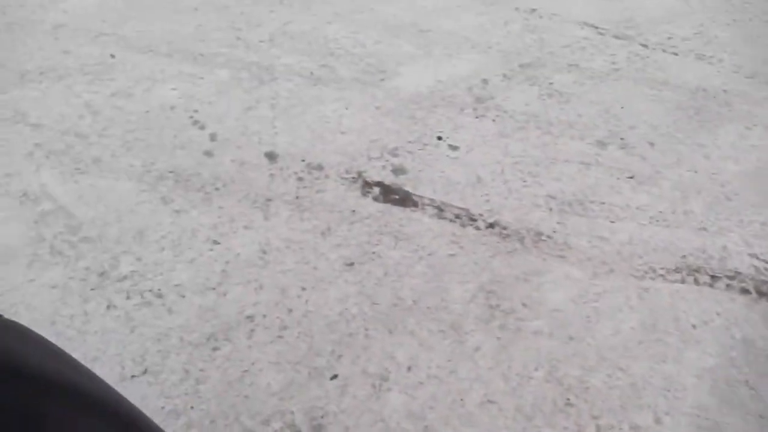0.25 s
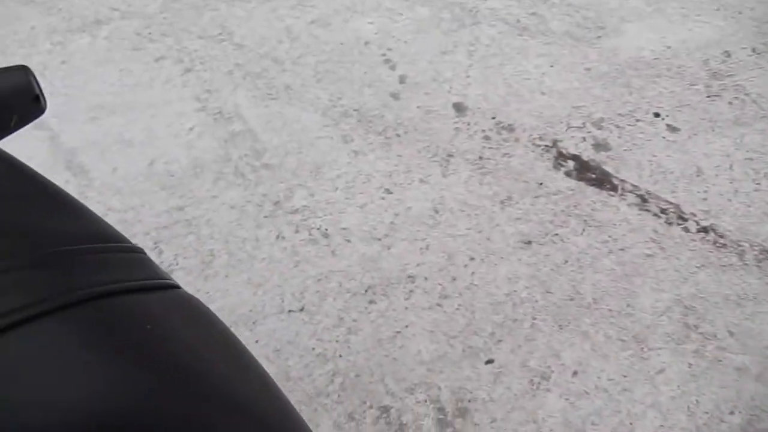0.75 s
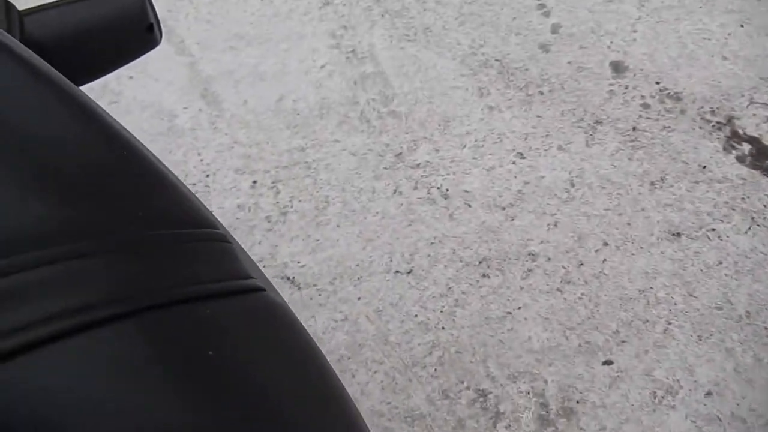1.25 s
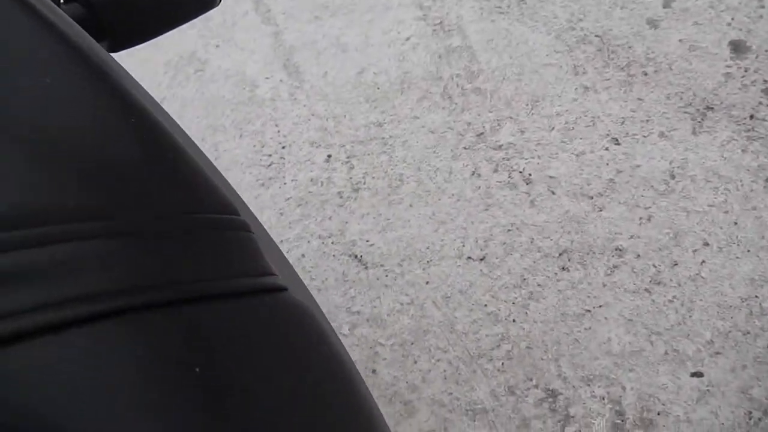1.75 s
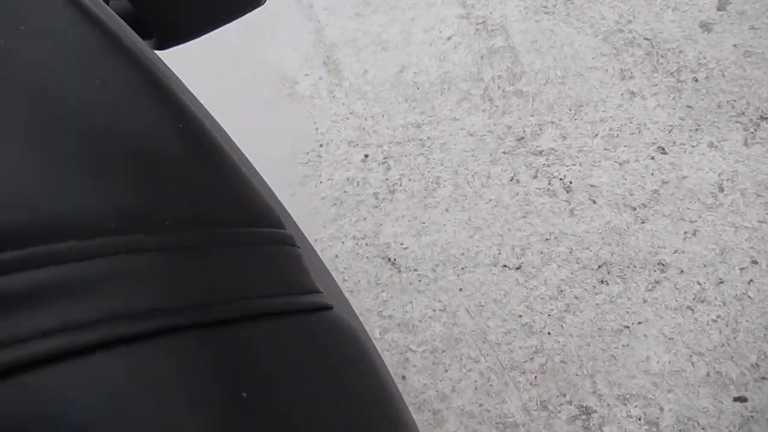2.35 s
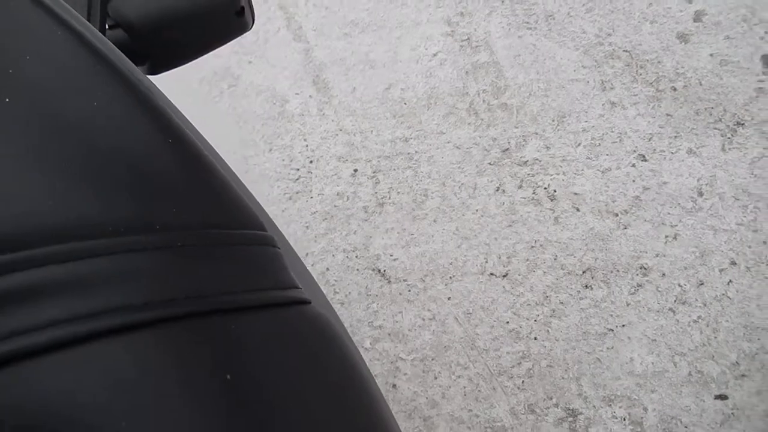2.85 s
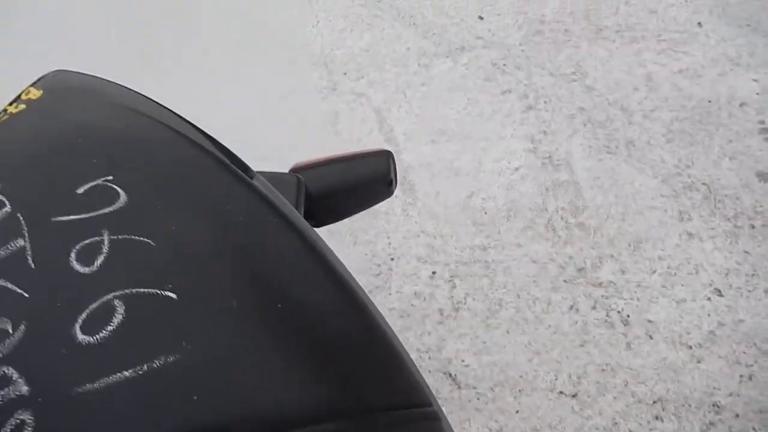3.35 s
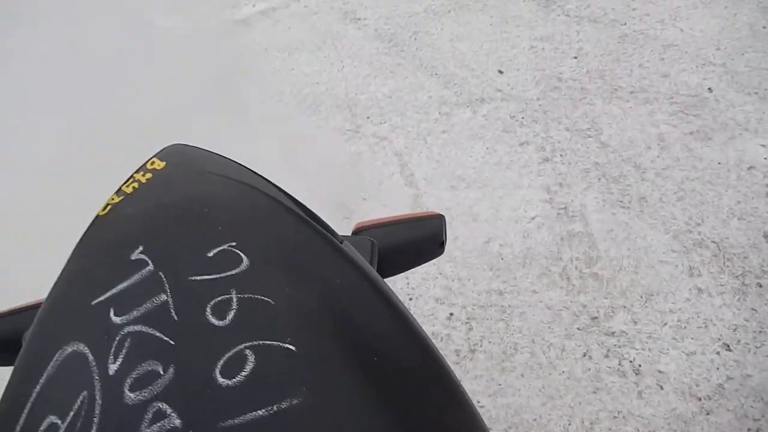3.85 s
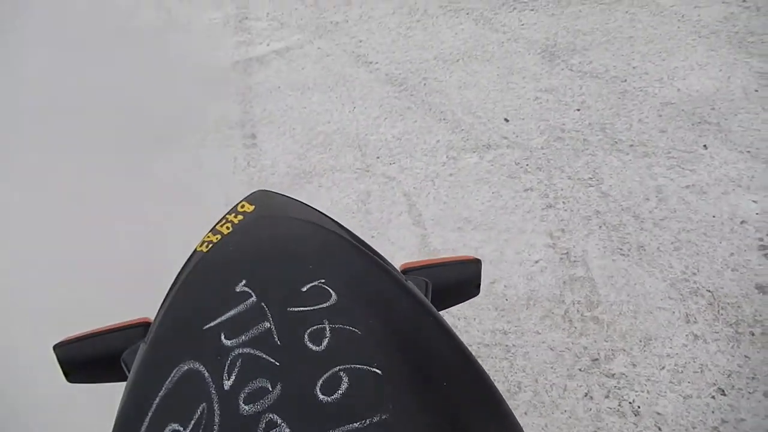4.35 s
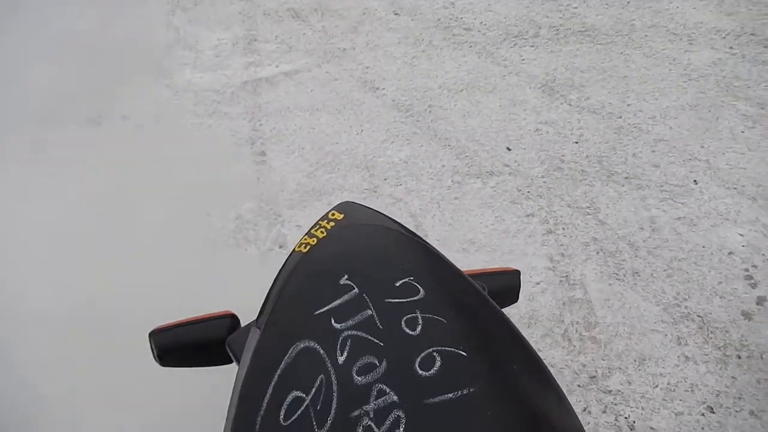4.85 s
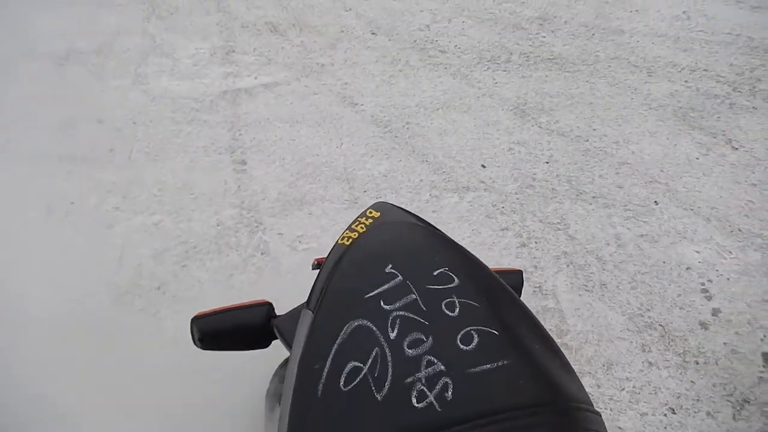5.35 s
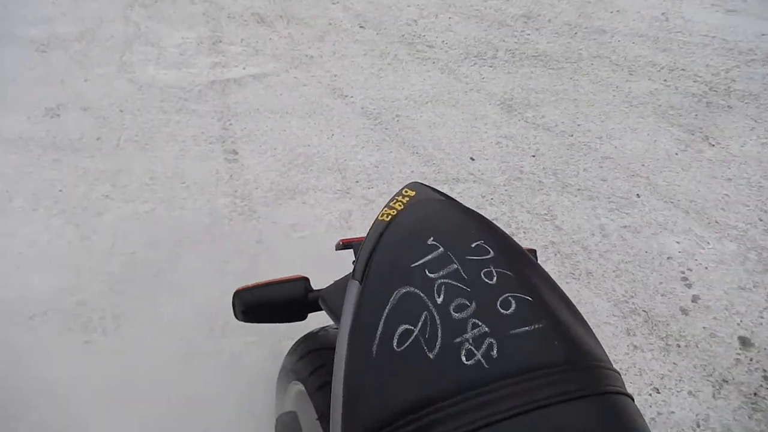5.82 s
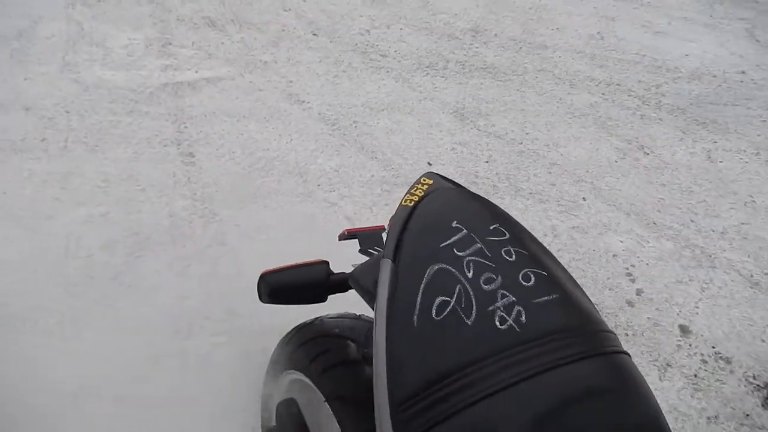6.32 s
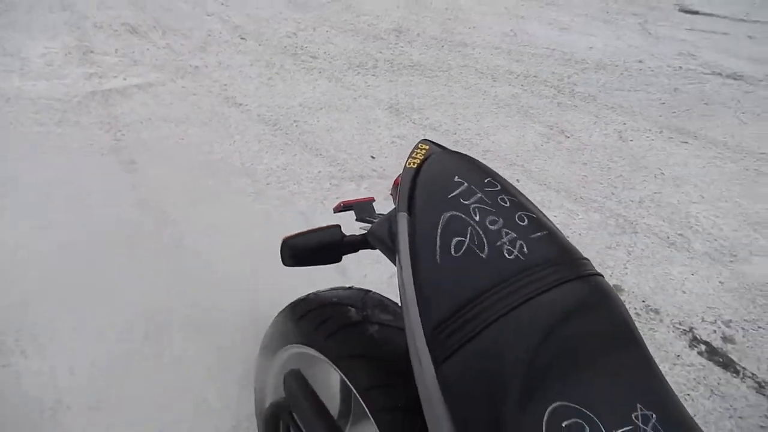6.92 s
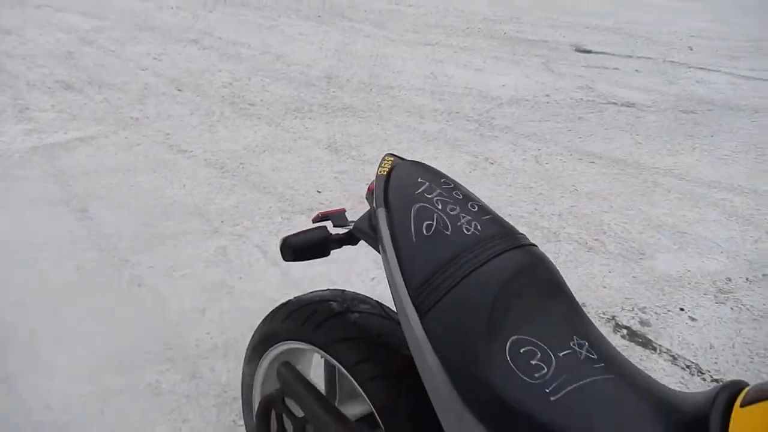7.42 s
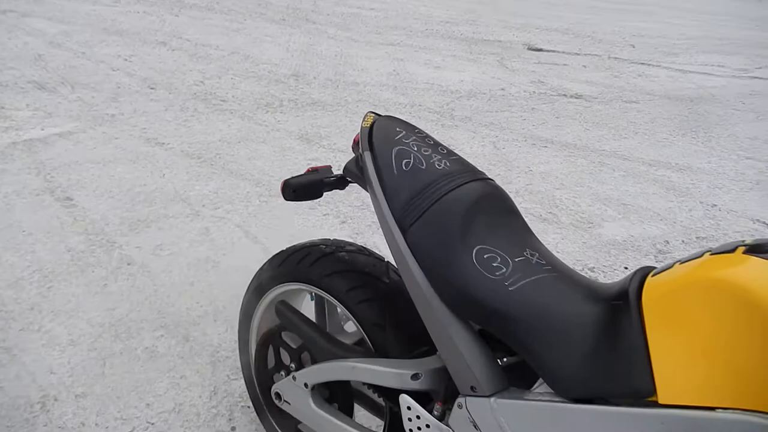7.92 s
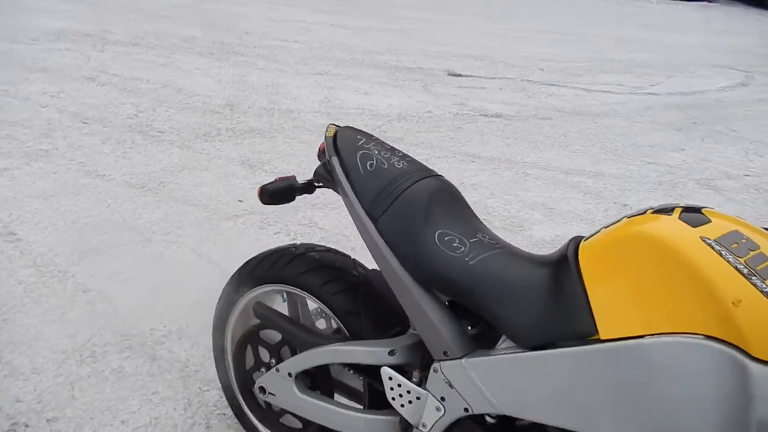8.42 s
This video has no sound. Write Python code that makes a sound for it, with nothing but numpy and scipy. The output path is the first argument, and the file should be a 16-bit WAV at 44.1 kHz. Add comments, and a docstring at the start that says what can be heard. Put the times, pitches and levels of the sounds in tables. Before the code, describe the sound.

A twin-cylinder motorcycle idles with a lumpy, skipping beat of deep exhaust thumps, metallic ticks and chain hiss. After two seconds a hollow whump starts four throttle blips, each faster than the last, with growl, rasp and intake snarl. It runs down through heavy burbles and ringing silencer, pops, then settles into irregular idle. Open concrete lot, close stereo microphone, bike slightly to the right, faint short reflections.

```python
"""A V-twin motorcycle on an open concrete lot idles with a lumpy beat of paired and skipped firings.
A hollow whump opens the first of four throttle blips, each reaching a higher speed than the last.
It then coasts with heavy single burns and surges of can ringing, pops, and settles to idle with soft huffs.
Exhaust puffs excite resonances of the pipe and the silencer can, and revving adds harmonic engine orders.
Shaped noise makes the gas jet, intake, chain hiss, ticks and clatter."""
import sys
import numpy as np
from scipy import signal
from scipy.fft import rfft, irfft
from scipy.io import wavfile
from scipy.ndimage import uniform_filter1d

SR = 44100
rng = np.random.default_rng(int(sys.argv[2]) if len(sys.argv) > 2 else 0)


def store_wav(level_fs):
    """Save 16-bit WAV to argv[1]."""
    pcm = np.round(np.clip(np.atleast_2d(level_fs), -1, 1) * 32767)
    wavfile.write(sys.argv[1], SR, pcm.T.astype(np.int16))


N = 382784
TIME = np.arange(N) / SR
REV_START_S, REV_END_S = 2.23, 6.55
REAR_DELAY = 315 / 720  # the rear cylinder fires this share of a four-stroke cycle after the front
IDLE_CYCLE_S = .125


def from_db(db):
    """Logarithmic level: decibels to amplitude ratio."""
    return 10 ** (np.asarray(db) / 20)


def rms_one(x):
    """Normalisation to unit mean power."""
    return x / np.sqrt(np.mean(x ** 2) + 1e-20)


def in_time(rows):
    """Linear interpolation of each column of a curve at every sample."""
    s, *columns = np.transpose(rows)
    return [np.interp(TIME, s, column) for column in columns]


def per_bin(points):
    """Interpolation of a spectrum over log frequency, at every FFT bin."""
    hz, value = np.transpose(points)
    bin_hz = np.arange(N // 2 + 1) * SR / N
    return np.interp(np.log(bin_hz + 1), np.log(hz), value)


def cut(x, hz, kind, order=2):
    """Butterworth filtering: a maximally flat passband."""
    return signal.sosfilt(signal.butter(order, hz, kind, fs=SR, output="sos"), x + 1e-18)


def resonate(x, modes):
    """Modal superposition: parallel damped resonators, rows of (f/Hz, width/Hz, level/dB)."""
    out = 0
    for hz, width, db in modes:
        radius = np.exp(-np.pi * width / SR)
        poles = [1, -2 * radius * np.cos(2 * np.pi * hz / SR), radius * radius]
        out = out + from_db(db) * (1 - radius) * signal.lfilter([1, 0, -1], poles, x + 1e-18)
    return out


def evened(x):
    """Short-term power normalisation over about a tenth of a second, with a floor for quiet parts."""
    power = uniform_filter1d(uniform_filter1d(x ** 2, size=3500), size=2500)
    return x / np.sqrt(np.abs(power) + power.max() / 10 ** 4)


def clicks(times, sizes):
    """Impulse excitation: one weighted sample for each event."""
    return np.bincount(np.clip(np.asarray(times) * SR, 0, N - 1).astype(int), sizes, N)


def swell(impulses, rise_s, decay_s):
    """Convolution: every impulse becomes an exponential burst envelope with a peak of its own height."""
    t = TIME[:SR // 4]
    shape = (1 - np.exp(-t / rise_s)) * np.exp(-t / decay_s)
    return signal.fftconvolve(impulses, shape / shape.max())[:N]


def bumps(rows):
    """Superposition of Gaussian bumps, rows of (t/s, half length/s, height)."""
    return sum(height * np.exp(-((TIME - s) / half_s) ** 2) for s, half_s, height in rows)


def delayed(x, lag):
    """Propagation delay in whole samples."""
    return np.pad(x, (int(abs(lag)), 0))[:N]


# likeness of the noise at the two microphone ports: f/Hz, likeness/1
LIKENESS = [(100, .99), (500, .93), (1000, .85), (2000, .8), (6000, .65), (13000, .5)]


def noise(colour):
    """Partial coherence: coloured stereo noise, less alike at the two ports in the treble; rms 1."""
    mid, side = rfft(rng.standard_normal((2, N)))
    alike = np.clip(per_bin(LIKENESS), 0, 1)
    ports = np.sqrt(1 + alike) * mid + np.sqrt(1 - alike) * side * [[1], [-1]]
    # the colour dies away an octave beyond either end
    ends = [(colour[0][0] / 2, -90), *colour, (colour[-1][0] * 2, -90)]
    return rms_one(irfft(ports * from_db(per_bin(ends)), N))


def knocks(rows, colour, rise_s, decay_s):
    """Dense modal ringing as noise bursts; the squared envelope starts softly and decays twice as fast."""
    times, db = np.transpose(rows)
    return swell(clicks(times, from_db(db / 2)), rise_s, decay_s) ** 2 * noise(colour)


# reflections around the lot: delay t/s, left level/dB, right level/dB
ECHOES = [(.011, -39, -41), (.017, -36, -29), (0.028, -10.5, -11)]


def reflections(exhaust):
    """Specular reflection: dull, delayed copies of the left port's exhaust sound."""
    dull = cut(exhaust[0], 1550, "low")
    return sum(from_db([[left_db], [right_db]]) * delayed(dull, s * SR) for s, left_db, right_db in ECHOES)


# throttle blips: opening t/s, shutting t/s, push/(four-stroke cycles/s^2)
BLIPS = [(2.1, 2.599, 46.7), (3.021, 3.232, 99.3), (3.594, 3.801, 88.1), (4.173, 4.464, 65.8)]
START_CYCLES_PER_S = 20.69
DRAG_PER_S = .62  # share of the speed lost per s
OPEN_S, SHUT_S = .104, .159  # time the push takes to build and to die


def effort():
    """Driven rotation with drag: speed in cycles/s, its share of top speed, and throttle opening."""
    push = 0
    for opens, shuts, hard in BLIPS:
        edge = np.minimum((TIME - opens) / OPEN_S, (shuts - TIME) / SHUT_S)
        push = push + hard * np.clip(edge + .5, 0, 1)
    gained = push * (TIME > REV_START_S) / SR + clicks([REV_START_S], [START_CYCLES_PER_S])
    speed = signal.lfilter([1], [1, -np.exp(-DRAG_PER_S / SR)], gained)
    speed = np.maximum(speed, START_CYCLES_PER_S * (TIME < REV_START_S))
    speed = np.maximum(speed, 1 / IDLE_CYCLE_S)
    return speed, speed / speed.max(), push / push.max()


# unevenness of the burns: t/s, spread of level/dB
UNEVEN = [(2.2, 1.8), (3.1, 1.0), (3.8, .7), (4.8, .7), (5.4, 1.4), (6.5, 2.4)]


def rev_puffs(cycles, rear_db, jitter_s):
    """Uneven pulse train: two firings a cycle, and their random departures from an even burn."""
    count = np.arange(int(2 * cycles[-1]))
    rear = count % 2
    times = np.interp(count // 2 + rear * REAR_DELAY, cycles, TIME)
    chance = rng.standard_normal((len(times), 2))
    spread_db = np.interp(times, *np.transpose(UNEVEN))
    times = times + jitter_s * spread_db * chance[:, 0]  # jitter_s is per dB of spread
    puffs = clicks(times, from_db(rear * rear_db + spread_db * chance[:, 1]))
    return puffs, clicks(times, chance[:, 1])


# idle beats with their own levels, mostly strong, a front and a rear firing each:
# t/s, front level/dB, rear level/dB (relative, before the gains in idling)
BEATS = [(0.008, -23, -11.5), (0.131, -12, -42), (0.251, -14.5, -14.5), (0.377, -12, -13.5),
         (0.621, -13, -12.5), (0.86, -11.5, -13.5), (1.095, -13, -15.5), (1.334, -13, -14.5),
         (1.57, -12, -17.5), (1.688, -21, -14), (1.802, -14, -15), (1.915, -14.5, -14), (2.003, -11.5, -11),
         (2.063, -35, -33), (2.094, -13.5, -19), (2.147, -14, -13.5), (6.55, -22, -36), (6.632, -49, -15.5),
         (7.027, -14.5, -35), (7.177, -19.5, -19), (7.305, -13.5, -14), (7.585, -14, -14),
         (7.714, -26, -17), (7.845, -11.5, -20), (7.981, -21, -14), (8.089, -13.5, -43),
         (8.216, -21, -16.5), (8.333, -15.5, -32), (8.468, -43, -16), (8.598, -14, -30)]
WEAK_FRONT_DB, WEAK_REAR_DB = -27, -23


def idle_firings():
    """Irregular pulse train: rows of (t/s, level/dB, cycle/s, 1 if rear), weak cycles filling the gaps."""
    rows = []
    ends = [beat[0] for beat in BEATS[1:]] + [BEATS[-1][0] + IDLE_CYCLE_S]
    for (start, front_db, rear_db), end in zip(BEATS, ends):
        count = max(1, round((end - start) / IDLE_CYCLE_S))
        cycle = (end - start) / count
        for k in range(count):
            rows.append((start + k * cycle, WEAK_FRONT_DB if k else front_db, cycle, 0))
            rows.append((start + (k + REAR_DELAY) * cycle, WEAK_REAR_DB if k else rear_db, cycle, 1))
    return np.array([row for row in rows if not REV_START_S < row[0] < REV_END_S])


def gas_drive(puffs, turbulence):
    """Mixed excitation: puffs are crisp at high speed and melt into the turbulent stream at low speed."""
    crisp = effort()[1] ** 1.5
    return crisp * puffs + turbulence * rng.standard_normal(N)


# brief buzzes: t/s, half length/s, level/dB
BUZZES = [(2.47, 0.026, -46), (2.605, 0.17, -49), (5.967, .08, -48)]
# their colour: f/Hz, level/dB
BUZZ = [(1900, -26), (2350, -2), (2900, 2), (3400, -31)]


def buzz():
    """Band-limited noise under Gaussian envelopes: something on the frame buzzes briefly."""
    return bumps([(s, half_s, from_db(db)) for s, half_s, db in BUZZES]) * noise(BUZZ)


# colour of small loose parts: f/Hz, level/dB
RATTLE = [(2500, -27), (3600, -16), (4050, 14), (5000, 11.5), (7000, 7), (8500, -5), (10400, 10),
          (12000, -5), (15500, -23)]


def rattle(running_db):
    """Stochastic impacts: small loose parts rattle at random, one blow in each equal slot of time."""
    chance = rng.random((170, 2))
    chance[:, 0] = (np.arange(len(chance)) + chance[:, 0]) / len(chance)
    blows = knocks(chance * [N / SR, -12], RATTLE, rise_s=0.0061, decay_s=0.023)
    return from_db(np.minimum(running_db - 0.5, -53)) * blows


# louder whirring as the drive chain goes slack or is snatched: start t/s, end t/s, gain/dB
WHIRRS = [(2.38, 2.857, 2), (2.995, 3.016, 6), (3.103, 3.163, 4.5), (3.342, 3.524, 3.5), (3.603, 3.67, 4),
          (3.91, 4.18, 3.5), (4.512, 4.802, 3), (4.798, 5.155, 1), (5.066, 5.155, 2.5), (5.458, 5.57, 3),
          (6.475, 6.547, 5.5)]


def whirr():
    """Smoothed switching: extra level of the chain's hiss in dB, changing within hundredths of a second."""
    gain_db = sum(db * ((TIME > start) & (TIME < end)) for start, end, db in WHIRRS)
    return uniform_filter1d(gain_db, size=800)


# reference level of chain and valve gear, before each layer's offset: t/s, level/dB
RUNNING = [(0.0, -49.5), (1.35, -54), (2.49, -44), (3.8, -43), (4.7, -41), (5.2, -47), (6.38, -47.5),
           (6.6, -52), (8.68, -44.5)]
# colours of the short clack and the longer clatter: f/Hz, level/dB
CLACK = [(1900, -2), (2450, -6), (2900, 1.5), (3300, -0.5), (3800, -14)]
CLATTER = [(1200, 18.2), (2000, 8.5), (2400, 10), (2900, 11.4), (3300, 8.4), (4500, 1)]
CLACK_LEAD_CYCLES = 0.453  # both come this far ahead of the front firing
CLACK_DB = -47  # at the mean running level
CLATTER_DB, CLATTER_DB_PER_DB, FULL_BURN_DB = 21.5, 2.8, -6  # over running, at a full burn; per dB of burn


def valve_gear():
    """Impact noise: a clack in each idle cycle that is not cut short, and a clatter that follows the burn."""
    times, burn_db, cycle, rear = idle_firings().T
    times = times - CLACK_LEAD_CYCLES * cycle
    heard = (rear == 0) & (cycle > .75 * IDLE_CYCLE_S) & (times > 0)
    running_db = np.interp(times, *np.transpose(RUNNING))
    clatter_db = running_db + CLATTER_DB + CLATTER_DB_PER_DB * (burn_db - FULL_BURN_DB)
    clack_db = CLACK_DB + .5 * (running_db - running_db.mean())
    clatter = knocks(np.column_stack([times, clatter_db])[heard], CLATTER, rise_s=0.0058, decay_s=0.1)
    clack = knocks(np.column_stack([times, clack_db])[heard], CLACK, rise_s=0.0048, decay_s=0.017)
    return clatter + clack


# ticks of the cylinder heads, before lead and offsets: t/s, edge level/dB, lower ring level/dB
TICKS = [(0.0348, -37, -50), (0.1022, -34, -49), (0.2209, -40, -58), (0.349, -36.5, -53),
         (0.5935, -36, -50), (0.6429, -42, -66), (0.8365, -39, -54), (1.071, -39, -48), (1.1228, -45, -59),
         (1.3129, -35, -51), (1.3625, -40, -60), (1.5454, -34, -50), (1.781, -33.5, -48),
         (1.89, -33.5, -47), (1.935, -42, -57), (1.9784, -33, -51), (2.0078, -37, -59), (2.072, -32, -43.5),
         (2.173, -36, -47), (2.2418, -36, -56), (6.022, -39, -47), (6.535, -37, -47), (6.9975, -36.5, -52),
         (7.1322, -36.5, -47), (7.279, -26.5, -39.5), (7.3382, -28.5, -48), (7.5602, -31, -41.5),
         (7.6175, -29.5, -51), (7.7418, -36, -52), (7.819, -25.5, -43), (7.9983, -29.5, -42),
         (8.065, -24.5, -41.5), (8.307, -29.5, -41), (8.4946, -28.5, -56), (8.568, -25.5, -46)]
# colours of the bright edge and the lower ring: f/Hz, level/dB
TICK_EDGE = [(5500, -8), (7000, -0.5), (8500, 2.5), (10400, 9.5), (12000, -1.5), (15500, -22)]
TICK_RING = [(2500, -13), (3000, 3.5), (3600, 2), (4050, 8.5), (5000, 3), (6500, -5.5)]
TICK_LEAD_S, EDGE_DB, RING_DB, CONTACTS_PER_S = 0.0075, -12, -3, 600


def head_ticks():
    """Clustered impacts: each tick is many tiny contacts, a bright edge over a longer, lower ring."""
    times, edge_db, ring_db = np.transpose(TICKS)
    starts = times - TICK_LEAD_S
    edge = knocks(np.column_stack([starts, edge_db + EDGE_DB]), TICK_EDGE, rise_s=.014, decay_s=.014)
    ring = knocks(np.column_stack([starts, ring_db + RING_DB]), TICK_RING, rise_s=0.014, decay_s=0.03)
    contacts = swell(1. * (rng.random(N) < CONTACTS_PER_S / SR), rise_s=.0002, decay_s=.0012)
    return (edge + ring) * rms_one(1 + contacts)


# colours of the churning gears and the hissing chain: f/Hz, level/dB
CHURN = [(20, -23), (45, -9.5), (70, 3.5), (110, 6), (170, -14.5), (270, -6.5), (400, -10.5), (650, -12),
         (900, -21.5), (1500, -25.5), (2100, -36), (2800, -66), (3600, -45)]
HISS = [(1760, 5.5), (3000, 8.5), (3660, 1.5), (4060, 7), (6490, -1.5), (7650, -4), (9940, 1), (11600, -7),
        (14300, -20.5), (15000, -31), (15600, -38)]
# ringing of the crankcase: f/Hz, width/Hz, level/dB
CASE_MODES = [(1700, 60, -11), (2394, 17.5, 10), (2785, 24, 6), (4040, 40, -2), (6800, 45, -10),
              (10220, 130, -6)]


def machinery(puffs):
    """Structure-borne sound: churn, hiss and metal contacts ring the case; all but churn ring the fins."""
    running_db = in_time(RUNNING)[0]
    churn = from_db(np.minimum(running_db + 23.5, -29)) * noise(CHURN)
    pulsing = evened(1 + 0.99 * swell(puffs, rise_s=0.00065, decay_s=0.036))
    hiss = from_db(running_db - 3.5 + whirr()) * noise(HISS) * pulsing
    metal = hiss + head_ticks() + valve_gear() + rattle(running_db)
    fin_hz = np.geomspace(3700, 12500, num=26) * rng.uniform(.98, 1.02, size=26)
    fins = resonate(metal, [(hz, 36, -3) for hz in fin_hz])
    return churn + metal + fins + buzz() + resonate(metal + churn, CASE_MODES)


# resonances of the air intake: f/Hz, width/Hz, level/dB
INTAKE_MODES = [(2370, 80, 6), (2580, 83, -13)]


def intake(puffs):
    """Pulsed turbulent flow: air snarls past the open throttle, a gulp a firing, softer at high speed."""
    _, pace, throttle = effort()
    gulps = evened(.5 + swell(puffs, rise_s=.001, decay_s=0.019)) * rng.standard_normal(N)
    snarl = rms_one(cut(resonate(gulps, INTAKE_MODES), [1900, 3400], "band"))
    return from_db(-50 - 4 * pace) * np.minimum(2 * throttle, 1) * snarl


# pops as the revs die: t/s, peak level/dB
BACKFIRE = [(6.536, -20.5), (6.556, -15)]
# soft huffs of late burning at idle: t/s, peak level/dB
HUFFS = [(0.6, -26), (7.07, -32), (7.155, -31.5), (7.25, -26), (7.345, -33.5)]
# colour of the huffs: f/Hz, level/dB
HUFF = [(230, 5), (400, 8), (700, 5), (1000, -7), (1600, -13), (3000, -27)]
# the first rich burn booms in the silencer: time, strength of its push, pitch and width
WHUMP_S, WHUMP_DB, WHUMP_HZ, WHUMP_WIDTH_HZ = 2.096, 38, 193, 18


def backfire():
    """Impulsive combustion: fuel catches in the pipe as a sharp pop, a soft huff or a hollow whump."""
    pop_colour = [(150, 7), (450, 12.5), (900, -6.5), (3200, -23), (4200, -23)]  # f/Hz, level/dB
    pop = knocks(BACKFIRE, pop_colour, rise_s=0.0026, decay_s=0.0082)
    huff = knocks(HUFFS, HUFF, rise_s=0.0088, decay_s=0.044)
    whump = resonate(clicks([WHUMP_S], [from_db(WHUMP_DB)]), [(WHUMP_HZ, WHUMP_WIDTH_HZ, 0)])
    return pop + huff + cut(whump, 400, "low")


# resonances of the silencer can: f/Hz, width/Hz, level/dB
CAN_MODES = [(534.4, 21.7, 11), (606, 14, -18), (700, 35, -12)]
# level of its steady ringing, before the offset: t/s, level/dB
CAN_LEVEL = [(0, -22.5), (.55, -30.5), (1.1, -31.5), (2.2, -35), (2.6, -42), (3.3, -32), (3.9, -36),
             (4.2, -41), (4.75, -27), (5.05, -24.5), (5.4, -22.5), (5.56, -18.5), (5.7, -23), (5.78, -20),
             (5.98, -18), (6.12, -31), (6.28, -19.5), (6.7, -36), (7.25, -24.5), (8.0, -26), (8.68, -27)]
# the can gives short hoots, at idle and while revving, before the offset: t/s, peak level/dB
HOOTS = [(0.049, -37), (0.186, -28), (0.272, -17), (0.325, -20.5), (0.52, -24), (0.552, -18.5), (0.69, -27),
         (0.828, -19.5), (1.136, -46), (1.253, -23.5), (1.506, -29), (1.825, -42), (1.908, -29),
         (4.18, -15), (4.455, -13), (6.719, -24), (6.828, -19.5), (7.045, -21.5), (7.209, -17),
         (7.323, -28), (7.443, -19), (7.541, -22), (7.655, -29), (7.759, -25), (8.073, -44), (8.208, -22),
         (8.38, -28), (8.461, -26), (8.588, -22)]
CAN_DB, HOOT_DB = -7, -6  # offsets


def silencer(puffs):
    """Shell resonance: the thin steel can, shaken by the gas, sings near one note and gives short hoots."""
    ring = cut(resonate(gas_drive(puffs, .009), CAN_MODES), [400, 900], "band")
    times, db = np.transpose(HOOTS)
    hoots = swell(clicks(times, from_db(db + HOOT_DB)), rise_s=0.0035, decay_s=0.022)
    firm = ring / np.sqrt(uniform_filter1d(ring ** 2, size=500) + .1 * np.mean(ring ** 2))
    # opposite sign, so the can adds to the bark and growl where they overlap
    return -from_db(in_time(CAN_LEVEL)[0] + CAN_DB) * evened(ring) - hoots * firm


def flare():
    """Transient gain: the exhaust's edge rises by up to 4.5 dB just after each throttle opening."""
    opens = [blip[0] for blip in BLIPS]
    return from_db(4.5 * swell(clicks(opens, np.ones(len(opens))), rise_s=0.034, decay_s=0.013))


# the engine stumbles: t/s, half length/s, loss/dB
STUMBLES = [(2.07, 0.024, 20), (2.215, 0.03, 6), (2.315, 0.012, 7), (2.425, 0.01, 3), (2.96, 0.015, 15),
            (3.422, 0.017, 7), (3.825, 0.019, 3), (4.54, .016, 8), (5.19, 0.019, 5), (5.25, 0.016, 4),
            (5.61, 0.012, 9), (6.1, 0.03, 5), (6.27, .02, 8)]


def stumble_loss_db():
    """Amplitude modulation: loss of exhaust level in dB while the engine stumbles."""
    return bumps(STUMBLES)


# heavy single burns during pick-up and run-down, relative: t/s, level/dB
LUMPS = [(2.268, -20), (2.386, -23), (2.79, -18), (5.565, -17.5), (5.797, -24), (5.845, -17), (5.894, -19),
         (5.945, -20.5), (5.995, -24), (6.042, -16), (6.159, -17), (6.205, -18), (6.3, -20)]
# the pipe's ring after a slow puff: f/Hz, width/Hz, level/dB
THUMP_MODES = [(74.3, 19, 10), (92.3, 7.6, 8), (111.7, 12.5, -6)]
# the pipe's bark, also heard when revving: f/Hz, width/Hz, level/dB
BARK_MODES = [(216, 22, -1.5), (258.4, 75, 5), (324, 9.7, -12), (392, 820, -6)]
# colour of the gas jet, also heard when revving: f/Hz, level/dB
RASP = [(500, 1), (650, -4.5), (850, -8.5), (1000, -12.5), (1250, -10.5), (1450, -13.5), (1660, -14),
        (1900, -22), (2400, -21), (2850, -25), (3600, -27), (6000, -38.5)]


def idling():
    """Impulse response: each slow, soft puff rings the pipe by itself and ends in a short chuff."""
    firings = [*map(tuple, idle_firings()[:, :2]), *map(tuple, LUMPS)]
    times, puff_db = np.transpose(sorted(firings))
    puffs = clicks(times, from_db(puff_db))
    gas = swell(puffs, rise_s=0.0033, decay_s=0.018) * rng.standard_normal(N)
    thump = cut(cut(resonate(puffs, THUMP_MODES), 200, "low"), 59.0, "high")
    bark = cut(resonate(puffs + 0.048 * gas, BARK_MODES), 514, "low")
    # a firing that follows a pause blows out harder
    rested = np.clip(np.diff(times, prepend=0) / 0.23, .3, 1)
    blows = clicks(times, from_db(puff_db) * rested ** 0.8)
    chuff = swell(blows, rise_s=0.003, decay_s=0.02) * noise(RASP)
    edge = flare()
    return from_db(45.0) * thump + edge ** 0.71 * from_db(27.5) * bark + edge * from_db(-14.0) * chuff


# snarl of the header pipe: f/Hz, width/Hz, level/dB
SNARL_MODES = [(1170, 53, -2), (1324, 57, -7), (1594, 36, -0.5), (1697, 24, -1.5)]


def header(puffs):
    """Periodic excitation: firings ring the header pipe as a fine comb of lines that grows with speed."""
    ring = resonate(gas_drive(puffs, .002), SNARL_MODES)
    ring = evened(cut(ring, [950, 1850], "band", order=3))
    return ring * from_db(-37.5) * effort()[1] ** 3.4


# the pipe's upper resonances: f/Hz, width/Hz, level/dB
GROWL_MODES = [(372.7, 13, 7.5), (504, 49, 1), (720, 37, -37), (1030, 79, 0)]


def growl(puffs):
    """Higher pipe modes: the puffs excite a growl that grows with speed and throttle."""
    _, pace, throttle = effort()
    ring = resonate(gas_drive(puffs, .0013), GROWL_MODES)
    ring = evened(cut(ring, [300, 1900], "band", order=3))
    return ring * pace ** 1.9 * from_db(-36 + 3.2 * throttle)


def jet_rasp(puffs, bark_db, even):
    """Jet noise: pulsing hiss of the gas, giving way by 2.5 dB to the snarl at full speed."""
    pace = effort()[1]
    jet = evened(1.25 - pace + pace * swell(puffs, rise_s=.0008, decay_s=.005))
    return jet * noise(RASP) * pace ** 0.34 * from_db(-19.5 + .5 * bark_db - 2.5 * even)


WAVER_PER_S = 9


def waver():
    """Random modulation: straight lines between Gaussian values of spread 1."""
    knots = np.arange(0, N / SR + 1, 1 / WAVER_PER_S)
    return np.interp(TIME, knots, rng.standard_normal(len(knots)))


# how the pipe passes a steady tone: f/Hz, level/dB
PIPE = [(35, -28), (55, -7.5), (66, -3), (80, 0), (105, 3), (150, -0.5), (200, -2.5), (250, 0), (330, 0),
        (420, -2), (540, 2.5), (620, -3.5), (750, 1.5), (950, -10)]
# engine orders favoured by the uneven firing: multiple of the cycle rate/1, low-speed level/dB,
# level coasting at high speed/dB, level pulling at high speed/dB
ORDER_DB = [(2, 0, 3.5, 0), (3, -3, -8, -6), (4, 0.5, -4, -0.5), (5, -2.5, -8.5, -7), (6, -9, 1.5, -3),
            (7, -9.5, -31, -9.5), (8, -8.5, -18.5, -10.5), (9, -14, -12.5, -10), (10, -17.5, -15, -14),
            (11, -28, -23, -8), (12, -18, -16.5, -8.5), (13, -25, -15, -14.5), (14, -20, -8.5, -15),
            (15, -22, -19, -29), (16, -22, -13, -18.5), (17, -23, -17, -26), (18, -23, -15, -22),
            (20, -29, -18.5, -21)]
WAVER_DB, WAVER_RAD = 2.25, .35  # spread up to half speed, falling to none at top speed
FAST_CYCLES_PER_S, FAST_SPAN_CYCLES_PER_S = 36.2, 3.5  # where the pipe changes its voice, over what range
PHASE_SPREAD_RAD = .13  # random phase spread per order, which softens the peaks of the pulses


def pipe_hum(cycles):
    """Harmonic synthesis: engine orders glide through the pipe's response as speed and load vary."""
    speed, pace, throttle = effort()
    hz, pipe_db = np.transpose(PIPE)
    loose = np.minimum(2 * (1 - pace), 1)
    load = np.minimum(3.6 * throttle, 1)
    fast = np.clip((speed - FAST_CYCLES_PER_S) / FAST_SPAN_CYCLES_PER_S + .5, 0, 1)
    out = 0
    for order, slow_db, coast_db, pull_db in ORDER_DB:
        k = round(order)
        fast_db = coast_db + (pull_db - coast_db) * load
        level_db = (1 - fast) * slow_db + fast * fast_db + np.interp(k * speed, hz, pipe_db)
        # odd orders come from the uneven firing and lie a quarter turn from the even ones
        phase = 2 * np.pi * k * cycles + (k % 2) * np.pi / 2
        phase = phase + PHASE_SPREAD_RAD * k * rng.standard_normal() + WAVER_RAD * loose * waver()
        out = out + from_db(level_db + WAVER_DB * loose * waver()) * np.cos(phase)
    return evened(out)


# exhaust while revving, before each layer's offset: t/s, bass level/dB, bark level/dB
EXHAUST = [(2.25, -17, -31), (2.42, -18.5, -24.5), (2.48, -17.5, -22.5), (2.6, -21.5, -18.5),
           (2.8, -17, -20.5), (2.92, -18, -21.5), (3.08, -17, -23.5), (3.27, -22, -24.5),
           (3.47, -17.5, -18), (3.65, -16, -18), (3.74, -22.5, -26), (3.85, -25, -24.5), (4.12, -16.5, -18),
           (4.3, -20, -19), (4.48, -20, -11), (4.72, -17, -14.5), (4.95, -19, -19.5), (5.13, -16, -19),
           (5.3, -20.5, -23), (5.5, -19, -21), (5.68, -23, -28.5), (5.88, -18.5, -23.5), (6.2, -22, -22),
           (6.5, -26.5, -29)]
# the exhaust rasps harder for a moment: t/s, half length/s, gain/dB
SURGES = [(2.8, 0.05, 2), (3.14, 0.031, 1.5), (3.64, 0.02, 0.5), (4.17, 0.048, 3), (4.69, .045, 2),
          (5.12, 0.043, 2.5), (5.99, 0.053, 1.5)]
# bass resonances of the exhaust: f/Hz, width/Hz, level/dB
BOOM_MODES = [(71, 15, 4), (94.6, 6.4, 3), (112, 14, -1)]
HUM_DB, RUMBLE_DB, BARK_DB = 0.7, -6.5, -5  # against the levels of bass and bark
RUMBLE_FADE_DB, BARK_FADE_DB = 20, 14  # loss from half to full speed


def revving(cycles, puffs, departures):
    """Source and filter: orders hum, uneven burns rumble, pipe modes bark and growl, a jet rasps."""
    bass_db, bark_db = in_time(EXHAUST)
    bass_db = bass_db - stumble_loss_db()
    bark_db = bark_db - 0.77 * stumble_loss_db()
    pace = effort()[1]
    # from half to full speed the burns even out: rumble and bark give way to clean orders
    even = np.maximum(2 * pace - 1, 0)
    hum = pipe_hum(cycles) * pace ** 0.41
    burble = departures + 0.033 * rng.standard_normal(N)
    rumble = evened(cut(cut(resonate(burble, BOOM_MODES), 80, "high", order=4), 200, "low"))
    bark = resonate(gas_drive(puffs, .014), BARK_MODES)
    bark = evened(cut(cut(bark, 192, "high", order=3), 457, "low"))
    low = from_db(bass_db + HUM_DB) * hum
    low = low + from_db(bass_db + RUMBLE_DB - RUMBLE_FADE_DB * even) * rumble
    middle = from_db(bark_db + BARK_DB - BARK_FADE_DB * even) * bark
    edge = growl(puffs) + jet_rasp(puffs, bark_db, even) + header(puffs)
    return low + middle + flare() * from_db(bumps(SURGES)) * edge


# balance of the two microphone ports: f/Hz, left minus right level/dB
BALANCE_DB = [(100, -0.16), (500, -2), (1200, -1), (1800, -0.5), (2700, -7.5), (4200, -2.5), (6400, -2.5),
              (8400, -16), (10300, -8), (15000, -13)]
PORT_LAG = 6  # samples by which the left port hears later


def two_ports(bike):
    """Level and time differences between the ports place the bike a little to the right."""
    left, right = irfft(rfft(bike) * from_db(per_bin(BALANCE_DB) * [[.5], [-.5]]), N)
    # the right capsule rolls off earlier in the bass, which turns its phase a little
    return np.array([delayed(left, PORT_LAG), cut(right, 3.8, "high", order=1)])


def scene():
    """Superposition of the whole bike and a few dull reflections, heard at two ports."""
    gate = uniform_filter1d(1. * ((TIME > REV_START_S) & (TIME < REV_END_S)), size=900)
    cycles = np.cumsum(effort()[0]) / SR
    puffs, departures = rev_puffs(cycles, rear_db=-0.5, jitter_s=.00005)
    gated_puffs = puffs * gate
    background = machinery(gated_puffs) + backfire()
    banging = idling() * from_db(-stumble_loss_db()) + silencer(gated_puffs)
    revs = gate * (revving(cycles, puffs, departures) + intake(puffs))
    return two_ports(background + banging + revs + reflections(banging))


def record(dry):
    """Soft saturation rounds the peaks, and an elliptic low-pass cuts the top above 15.7 kHz."""
    rounded = 1.542 * np.tanh(dry / 1.032)
    return signal.sosfilt(signal.ellip(10, .1, 80, 15700, fs=SR, output="sos"), rounded)


dry = scene()
out = record(dry)
store_wav(out)
```